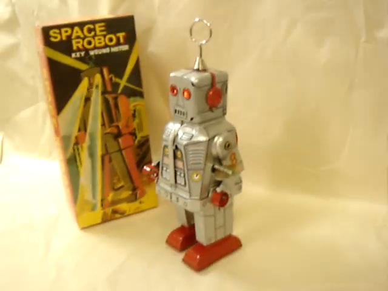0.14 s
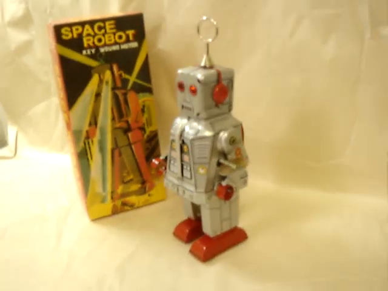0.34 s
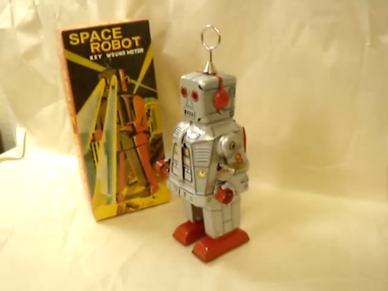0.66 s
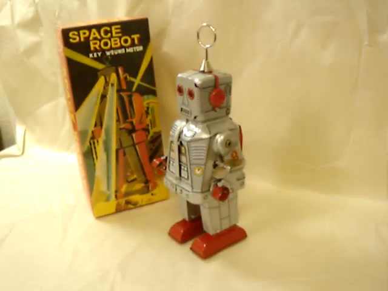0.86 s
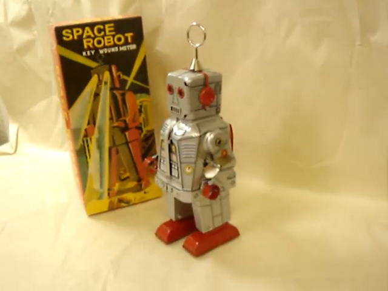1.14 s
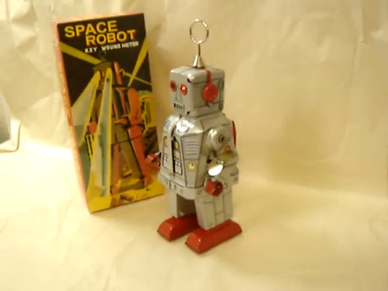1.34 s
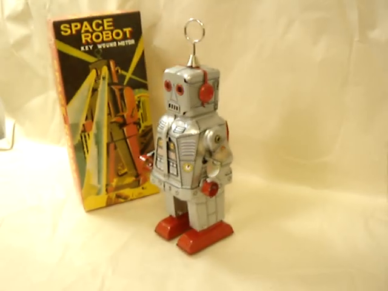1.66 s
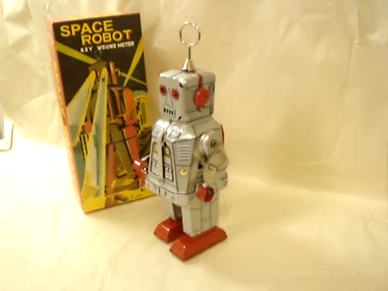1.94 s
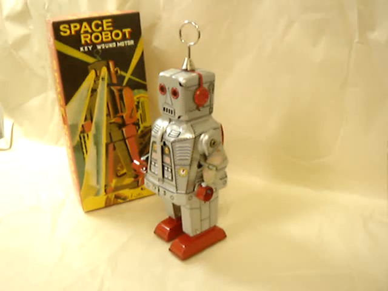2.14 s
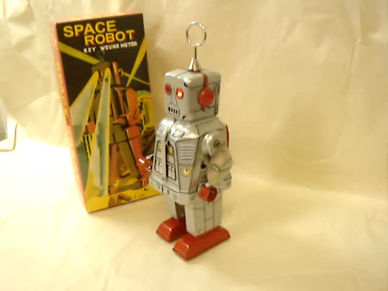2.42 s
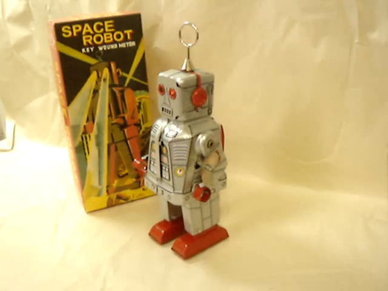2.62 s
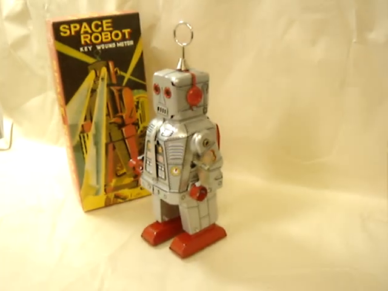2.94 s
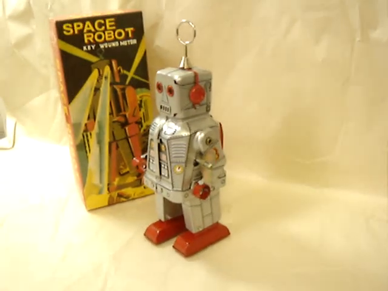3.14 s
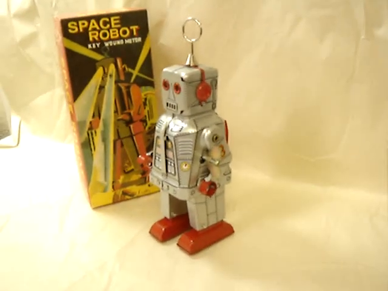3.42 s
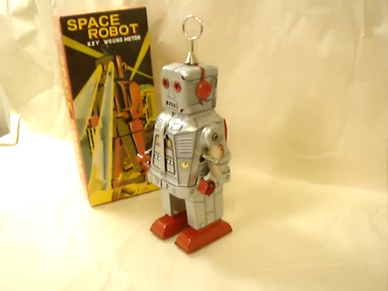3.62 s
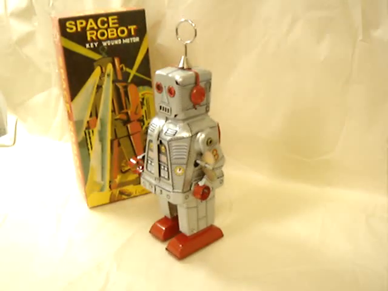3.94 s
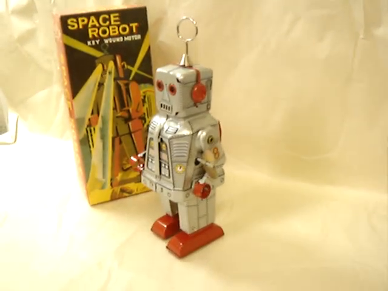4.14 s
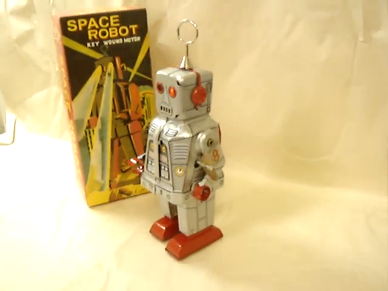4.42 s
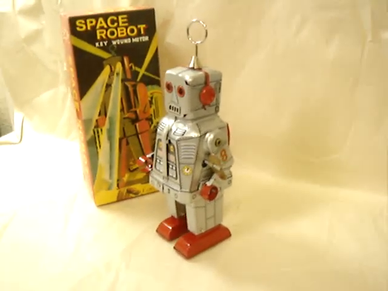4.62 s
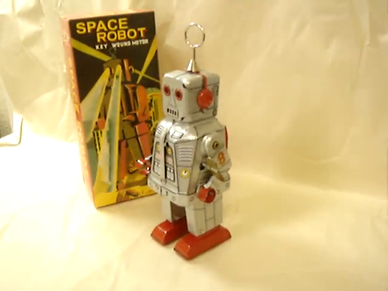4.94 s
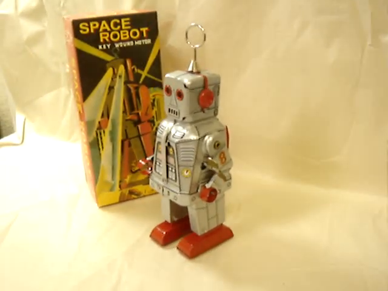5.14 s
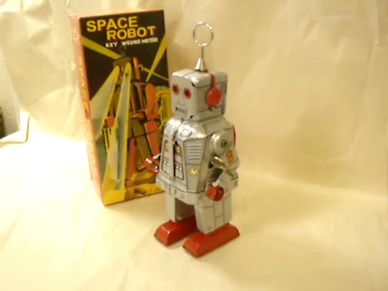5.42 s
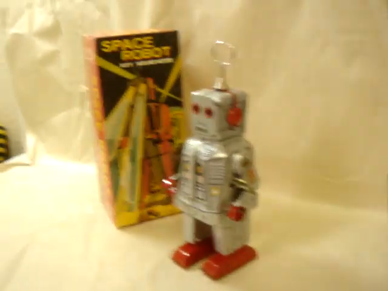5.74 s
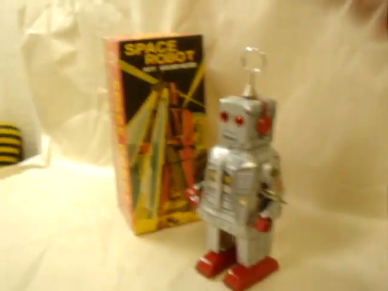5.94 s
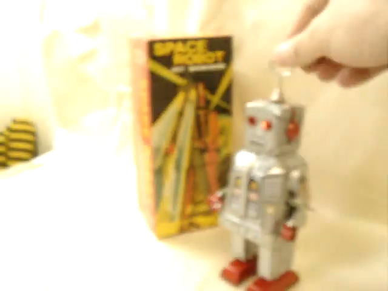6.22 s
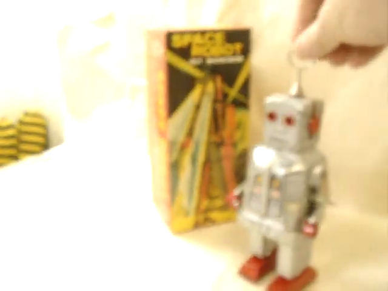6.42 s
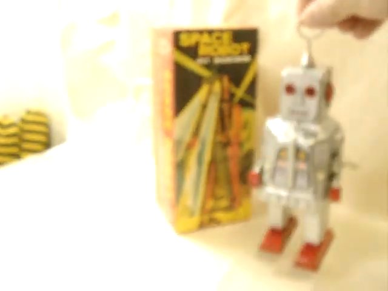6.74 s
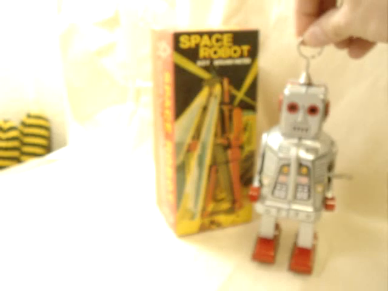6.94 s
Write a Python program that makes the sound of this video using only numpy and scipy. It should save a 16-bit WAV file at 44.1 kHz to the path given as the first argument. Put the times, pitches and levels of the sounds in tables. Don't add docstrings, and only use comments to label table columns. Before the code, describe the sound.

A wind-up tin toy robot whirs and rattles steadily, dense bright gear chatter with rapid clacks, very close in a quiet room.

```python
import sys
import numpy as np
from scipy import signal
from scipy.io import wavfile
from scipy.ndimage import uniform_filter1d

SR = 44100
rng = np.random.default_rng(int(sys.argv[2]) if len(sys.argv) > 2 else 0)


def makeup_ratio(level_db):
    decades = np.asarray(level_db, float) / 20
    return 10 ** decades


def bounce(signal):
    frames = np.transpose(np.atleast_2d(signal))
    limited = np.clip(frames, -1, 1)
    pcm = np.round(limited * 32767).astype(np.int16)
    wavfile.write(sys.argv[1], SR, pcm)


N = 312217
T = np.arange(N) / SR
TURN_S = 0.1
BEAR_S, LIFT_S = 0.12, 6.55


def rms(x):
    return np.sqrt(np.mean(x ** 2))


def evened(x):
    return x / np.sqrt(np.mean(x ** 2) + 1e-20)


def curve(rows):
    return np.interp(T, *np.transpose(rows))


def flutter(rate_hz):
    return evened(signal.lfilter(*signal.butter(2, rate_hz, fs=SR), rng.standard_normal(N)))


def ring(x, modes, under=((1, -80), (2, -80)), order=1):
    hz = np.fft.rfftfreq(8192, 1 / SR)
    colour_hz, colour_db = np.transpose(under)
    power = makeup_ratio(np.interp(np.log(hz + 1), np.log(colour_hz), colour_db)) ** 2
    for centre, width, top_db in modes:
        power = power + makeup_ratio(top_db) ** 2 / (1 + (2 * (hz - centre) / width) ** 2) ** order
    log_gain = 0.5 * np.log(np.r_[power, power[-2:0:-1]] + 1e-10)
    taps = np.fft.ifft(np.exp(np.conj(signal.hilbert(log_gain)))).real[:4096]
    return evened(signal.oaconvolve(x, taps)[:N])


def room_murmur():
    # frequency in Hz, level in dB.
    room_colour = [(12, -46), (20, -13.5), (64, -22), (125, -1.5), (215, -1.5), (270, 3.5), (427, -5),
                   (487, 2), (653, 0.5), (745, 5), (849, -17.5), (1000, 4.5), (1300, -14), (2200, -120)]
    lumps_db = 3.7 * flutter(14.7) - 5.6 * lifted()
    return makeup_ratio(-52) * ring(rng.standard_normal(N) * makeup_ratio(lumps_db), [], room_colour)


def lifted():
    return np.clip((T - LIFT_S) / BEAR_S, 0, 1)


def gear_train():
    # time in seconds, pinion tooth rate in Hz.
    pinion_speed = [(0.0, 133.0), (0.2, 173.0), (0.45, 132.9), (1.38, 187.3), (1.52, 215.6), (1.67, 135.5),
                    (2.05, 169.8), (2.27, 141.8), (2.54, 181.7), (3.06, 126.2), (3.43, 158.1),
                    (3.79, 135.3), (4.53, 128.7), (4.99, 147.2), (5.24, 126.0), (5.96, 140.9),
                    (6.31, 118.5), (7.08, 115.7)]
    tooth_hz = curve(pinion_speed)
    teeth = np.cumsum(tooth_hz * (1 + 0.012 * flutter(30))) / SR
    return tooth_hz, teeth


def ticks(per_s, spread_db):
    loudness_db = spread_db * np.minimum(rng.exponential(1, N), 3)
    size = makeup_ratio(loudness_db) * rng.choice([-1.0, 1.0], N)
    train = evened(size * (rng.random(N) < per_s / SR))
    return evened(train / np.sqrt(abs(uniform_filter1d(train ** 2, size=180)) + 0.11))


def tooth_mesh(teeth, clack):
    landing = 1 + 1.04 * np.exp(-(teeth % 1) / 0.61)
    mesh = landing * makeup_ratio(1.52 * flutter(140))
    return mesh / (1 + 2.8 * uniform_filter1d(clack, size=1300))


def tin_shell(drive):
    # panel resonance in Hz, width in Hz, level in dB.
    panel_modes = [(2233, 187, -5), (2160, 300, -7.5), (2980, 290, -5.5), (3027, 40, -8.5),
                   (3657, 160, 0.5), (3850, 190, 1), (3680, 330, -2), (3515, 350, -3.5), (4000, 200, 2.5),
                   (4665, 110, 1.5), (4600, 490, 1.5), (5110, 48, -3), (5180, 240, 3), (5140, 450, 0),
                   (5278, 125, -0.5), (5720, 75, -1), (5770, 190, -1.5), (6380, 67, -3), (6254, 67, -3),
                   (6750, 260, -6.5), (7130, 40, -9), (7490, 82, -8.5), (8800, 380, -9.5)]
    # the panel begins and ceases to face the microphone, both in seconds.
    facing_times = [(-1, 5.2), (5.2, 8), (-1, 8), (-1, 5), (-1, 2.4), (-1, 1.65), (2.4, 5.2), (3.3, 8),
                    (5.68, 6.6), (1.85, 3.0), (3.0, 5.2), (-1, .3), (.87, 1.58), (1.6, 4.3), (4.3, 8),
                    (-1, .5), (.87, 1.58), (1.85, 2.95), (2.95, 5.6), (-1, .3), (1, 8), (1.9, 8),
                    (1.9, 6.2)]
    # frequency in Hz, level in dB.
    shell_colour = [(900, -15.5), (1750, 1), (2200, -2), (2620, 1), (3000, 2), (3600, 9), (4200, 10),
                    (5200, 11.5), (6500, 9), (7300, 6.5), (8200, 2), (9600, 4.5), (10300, -5.5)]
    out = makeup_ratio(-3.0) * rms(drive) * ring(drive, [], shell_colour)
    uneven = flutter(19.7)
    push_or_pull = rng.choice([-1.0, 1.0], N)
    for k, ((hz, width, db), (start, end)) in enumerate(zip(panel_modes, facing_times), 1):
        facing = np.clip(np.minimum(T - start, end - T) / TURN_S + 0.5, 0, 1)
        shift = k * N // (len(panel_modes) + 1)
        strength = facing * makeup_ratio(db - 12.5 + 2.0 * np.roll(uneven, shift))
        struck = drive * np.roll(push_or_pull, shift) * strength
        pole = np.exp((2j * np.pi * hz - 1.5 * np.pi * width) / SR)
        mode = np.r_[1, 0, -1, np.poly([pole, pole.conj()]).real]
        out += rms(struck) * evened(signal.sosfilt([mode, mode], struck))
    no_bass = signal.butter(2, 400, "high", fs=SR, output="sos")
    return signal.sosfilt(no_bass, out)


def chest_turn_db():
    swing = np.clip((T - 5.7) / TURN_S, 0, 1)
    return -10 + 0.49 * T + 0.5 * swing - 4 * lifted() + 0.75 * flutter(5.1)


def hollow_chest(drive):
    # resonance in Hz, width in Hz, level in dB.
    chest_modes = [(1170, 53, -4.5), (1231.4, 77, 0.5), (1354, 78, -5.5), (1446, 62, -9.5),
                   (1617, 95, -12.5)]
    return makeup_ratio(-2.5) * rms(drive) * ring(drive, chest_modes, order=2)


def load_db(hum=0):
    # start in seconds, length in seconds, load in dB, extra hum in dB.
    strides = [
        (0, .45, 1.5, -9.5),
        (.95, .65, -2, -0.5),
        (1.7, 0.47, -4, -0.5),
        (2.35, 0.58, -5, 2),
        (3.45, 0.6, -7, 2),
        (4.18, 0.11, -12.5, -8),
        (4.55, 0.52, -17.5, 13),
        (5.55, 0.047, -4.5, -6),
        (5.78, .52, -15.5, 8.5),
    ]
    load = makeup_ratio(-9.5)
    for start, length, db, hum_db in strides:
        bearing = np.clip(np.minimum(T - start, start + length - T) / BEAR_S + 0.5, 0, 1)
        load = load + makeup_ratio(db + hum * hum_db) * bearing
    return 20 * np.log10(load) - 9 * lifted()


def table_top(clack):
    # resonance in Hz, width in Hz, level in dB.
    table_modes = [(132, 190, -20.5), (278.6, 61, -1.5), (336, 99, -3), (497, 19, -4), (600, 160, -13),
                   (785, 103, -4.5), (927, 75, -5)]
    level_db = -46.5 + load_db() + 1.53 * flutter(11)
    drive = ticks(3000, 1.1) * makeup_ratio(level_db) * (1 + 8.0 * clack)
    return makeup_ratio(-5.0) * rms(drive) * ring(drive, table_modes, order=2)


def pinion_hum(tooth_hz, teeth):
    # multiple of the tooth rate, level in dB.
    overtones = [(2, -3.5), (3, -8)]
    level_db = -62 + 1.06 * load_db(hum=1) + 0.1059 * (tooth_hz - 150)
    tone = np.zeros(N)
    for multiple, db in [(0.99, 0.005), *overtones]:
        tone += makeup_ratio(db) * np.sin(2 * np.pi * multiple * teeth)
    return np.sqrt(2) * makeup_ratio(level_db + 2.5 * flutter(9.3)) * tone


def clacks():
    # time in seconds, peak in dB, chest ring in relative dB.
    hard = [(0.096, -13.5, -12), (0.2883, -8.5, -20), (0.5222, -7.5, -20), (0.7276, -8, -24),
            (0.9627, -14.5, -18.5), (1.0827, -8.5, -26.5), (1.3028, -12.5, -15), (1.504, -6.5, -26.5),
            (1.7286, -10, -26), (1.9112, -7.5, -16), (2.176, -15.5, -24), (2.4177, -6.5, -20),
            (2.6713, -13.5, -16.5), (2.9233, -8.5, -26), (3.0114, -7, -21.5), (3.267, -5.5, -23),
            (3.5433, -11, -25.5), (3.672, -14, -14.5), (3.939, -10, -10), (4.0747, -10, -20),
            (4.225, -9.5, -13.5), (4.6314, -11.5, -14), (4.8874, -11.5, -14.5), (5.1527, -9, -23.5),
            (5.3371, -9, -16), (5.685, -8, -13), (6.0796, -10.5, -21), (6.1893, -4.5, -14),
            (6.5632, -6.5, -22), (6.7935, -7.5, -23)]
    # time in seconds, peak in dB.
    further_hard = [(0.1804, -7.5), (0.3463, -18), (0.6103, -10.5), (0.818, -20), (1.2473, -14.5), (1.5838, -12.5),
                    (1.7933, -8), (2.1046, -7), (2.25, -13.5), (2.605, -12), (2.7995, -13.5), (2.9784, -8.5),
                    (3.0967, -13.5), (3.1752, -8.5), (3.3174, -8), (3.4215, -5.5), (3.7534, -13), (4.3715, -12),
                    (4.487, -12.5), (4.7084, -9.5), (4.959, -9), (5.028, -10.5), (5.26, -12), (5.4286, -14.5),
                    (5.5593, -10), (5.8257, -14), (5.902, -17.5), (6.3375, -9.5), (6.6794, -6.5), (6.99, -9.5)]
    # time in seconds, turns a second in Hz.
    wheel_speed = [(0, 26.5), (3.1, 33.5), (5.3, 27), (7.1, 28.5)]
    light_chest_db, chest_spread_db = -16.5, 3.0
    late, strong, hollow, further_hollow = rng.standard_normal((300, 4)).T
    further_chest_db = light_chest_db - 3 + chest_spread_db * further_hollow[:len(further_hard)]
    marked = np.r_[hard, np.c_[further_hard, further_chest_db]] + [-0.0005, 3, 1.5]
    ends = np.sort(np.r_[-0.01, marked[:, 0], N / SR])
    turns = np.round(np.diff(ends) * np.interp(ends[1:], *np.transpose(wheel_speed)))
    turns = np.maximum(turns, 1).astype(int)
    gaps = zip(ends, ends[1:], turns)
    s = np.concatenate([np.linspace(a, b, count, endpoint=False)[1:] for a, b, count in gaps])
    n = len(s)
    light_db = -10.5 + 2.5 * strong[:n]
    light = np.c_[s + 0.0027 * late[:n], light_db, light_chest_db + chest_spread_db * hollow[:n]]
    return np.r_[marked, light].T


def clack_envelopes():
    rise_s, fall_s = 0.0015, 0.0037
    s, db, chest_db = clacks()
    marks = np.zeros((2, N))
    marks[:, (s * SR).astype(int)] = makeup_ratio([db - 10.5, db + chest_db - 0.5])
    t = T[:3000]
    skid = (1 - np.exp(-t / rise_s)) * np.exp(-t / fall_s)
    return signal.oaconvolve(marks, skid[None] / skid.max(), axes=1)[:, :N]


def toy():
    # time in seconds, chatter level in dB.
    spring_effort = [(0.0, -22.5), (0.41, -22.5), (0.49, -26), (1.04, -22.5), (1.54, -22), (1.62, -24.5),
                     (2.44, -21.5), (3.31, -25), (3.45, -23.5), (4.41, -26.5), (4.69, -24), (5.56, -25.5),
                     (5.9, -23), (5.99, -25.5), (6.62, -24.5), (7.08, -26)]
    chatter_db = curve(spring_effort) + 1.33
    tooth_hz, teeth = gear_train()
    clack, clack_chest = clack_envelopes()
    mesh = tooth_mesh(teeth, clack)
    impacts = ticks(14000, 1.63)
    panel_chatter = makeup_ratio(chatter_db) * evened(mesh)
    chest_chatter = makeup_ratio(chatter_db + chest_turn_db()) * evened(mesh ** 0.69)
    shell = tin_shell(impacts * np.hypot(panel_chatter, clack))
    chest = hollow_chest(impacts * np.hypot(chest_chatter, clack_chest))
    return shell + chest + table_top(clack) + pinion_hum(tooth_hz, teeth) + steps()


def steps():
    # time in seconds, peak of the thud in dB, knock in relative dB.
    footfalls = [(1.258, -70, -19), (1.889, -64, 6), (3.242, -60, 3), (3.492, -60, -2), (4.077, -56, -9),
                 (4.249, -55, -4), (4.712, -51, -16), (5.262, -70, 3), (5.467, -62, 16), (5.561, -62, -24),
                 (6.541, -61, -1), (6.772, -56, -6)]
    thud_s, knock_s = 0.009, 0.0027
    out, t = np.zeros(N), T[:4000]
    push = np.sin(np.pi * t / thud_s) * np.exp(-t / thud_s)
    knock = (np.sin(2 * np.pi * 330 * t) + np.sin(2 * np.pi * 620 * t)) * np.exp(-t / knock_s)
    for s, db, knock_db in footfalls:
        out[int(s * SR):][:len(t)] += makeup_ratio(db + 3.5) * (push + makeup_ratio(knock_db) * knock)
    return out


def scene():
    return (toy() + room_murmur())[None]


def sag(rows):
    db = 10 * np.log10(uniform_filter1d((abs(rows) ** 2).mean(0), size=3) + 1e-20)
    return db - uniform_filter1d(db, size=80)


def starve(x):
    hz, t, z = signal.stft(x, SR, nperseg=512, noverlap=384)
    band = (hz - 4700) // 430
    keep = np.ones(z.shape)
    for b in range(13):
        second = b == 1
        luck = evened(uniform_filter1d(rng.standard_normal(len(t)), size=3 + 3 * second))
        margin_db = sag(z[band == b]) + 1.1 * sag(z) + 4.0 * luck + 6.9
        margin_db = margin_db - 0.3 * t - 0.4 * t * second - 0.08 * b - 1.2 * (b > 10)
        keep[band == b] = 1 / (1 + makeup_ratio(-30 * np.clip(margin_db, -2, 2)))
    return signal.istft(z * keep, SR, nperseg=512, noverlap=384)[1][:N]


def band_limit(x):
    return signal.sosfilt(signal.butter(12, 11310, fs=SR, output="sos"), x)


def record(dry):
    limited = 0.6 * np.tanh(dry[0] / 0.6)
    edge = signal.firwin(801, 10150, window=("kaiser", 10), fs=SR)
    mix = signal.oaconvolve(starve(limited), edge, "same")[None]
    return band_limit(mix)


dry = scene()
out = record(dry)
bounce(out)
```